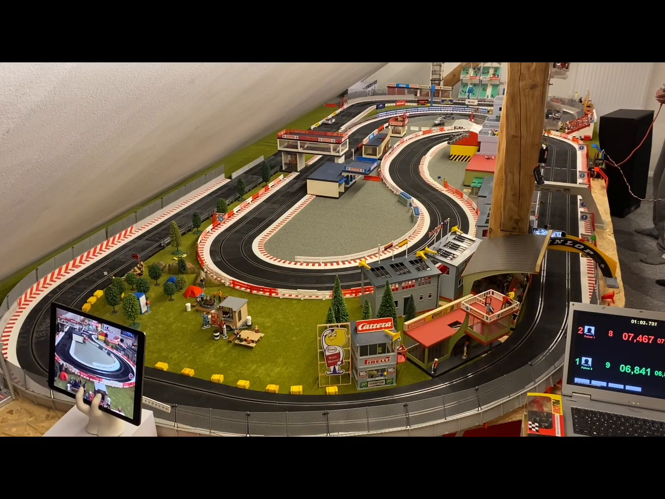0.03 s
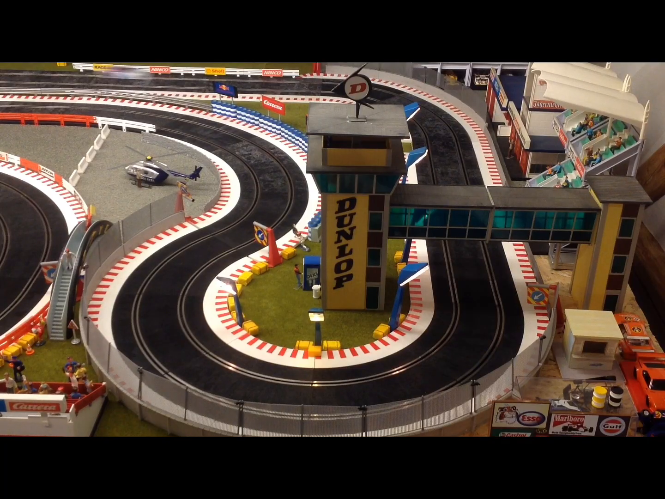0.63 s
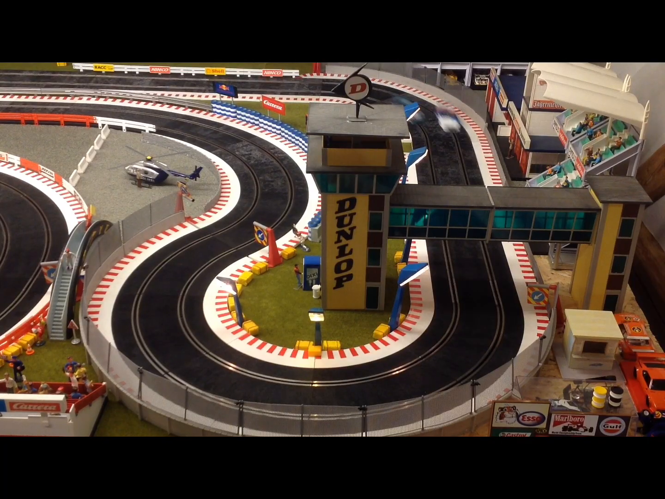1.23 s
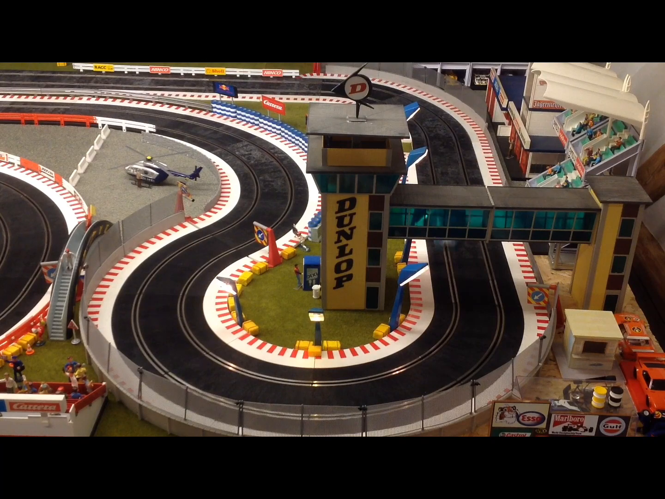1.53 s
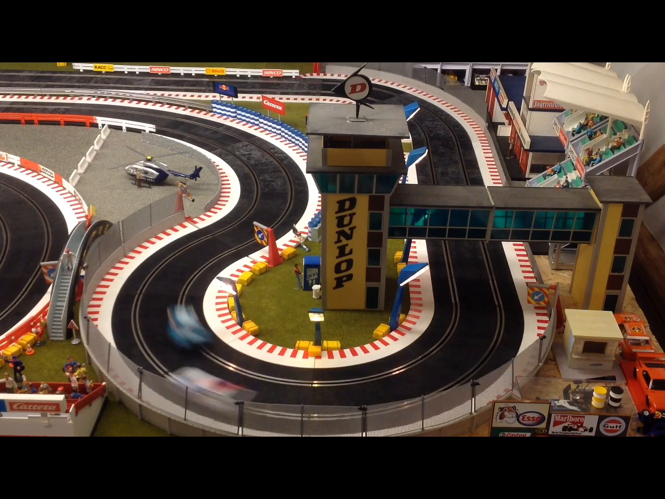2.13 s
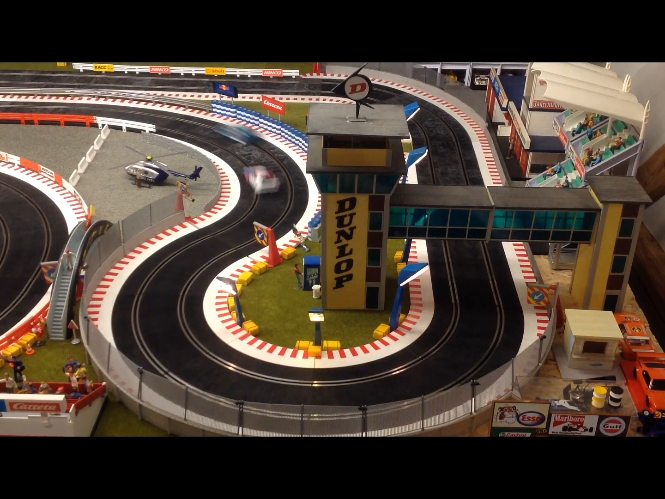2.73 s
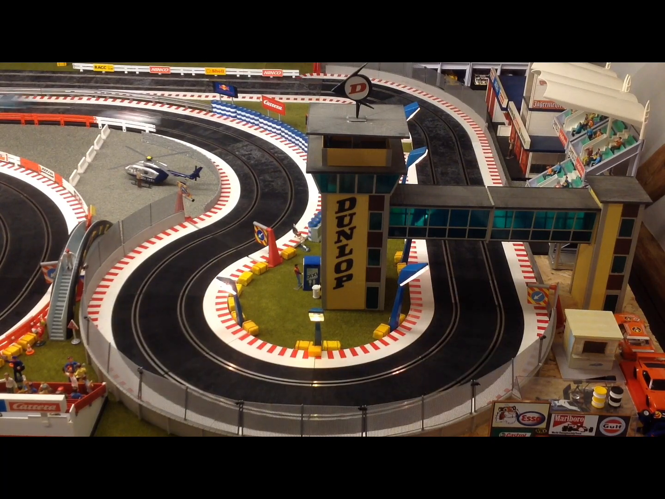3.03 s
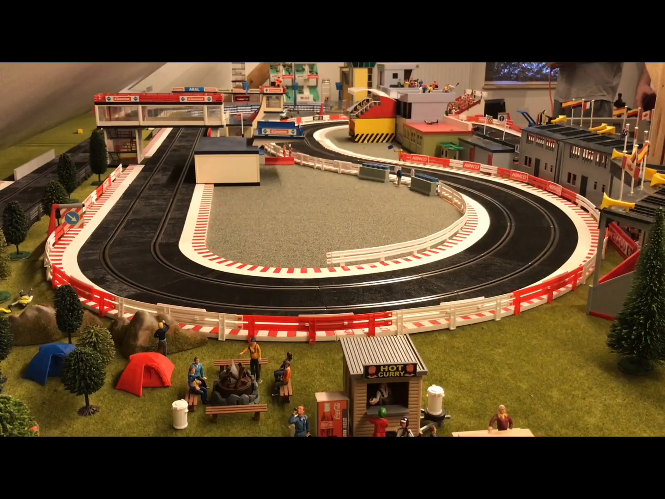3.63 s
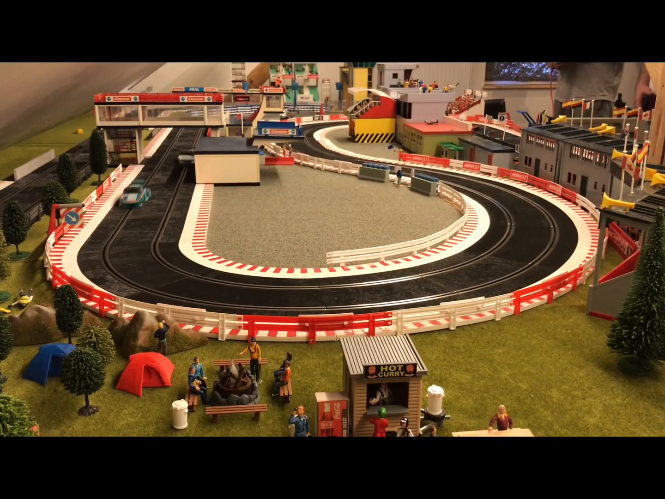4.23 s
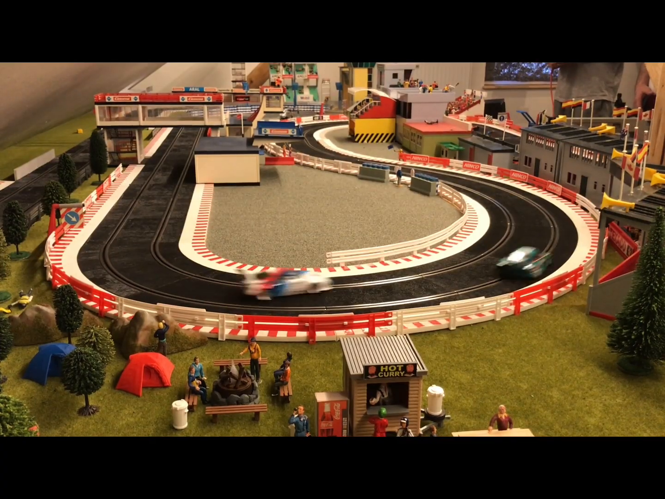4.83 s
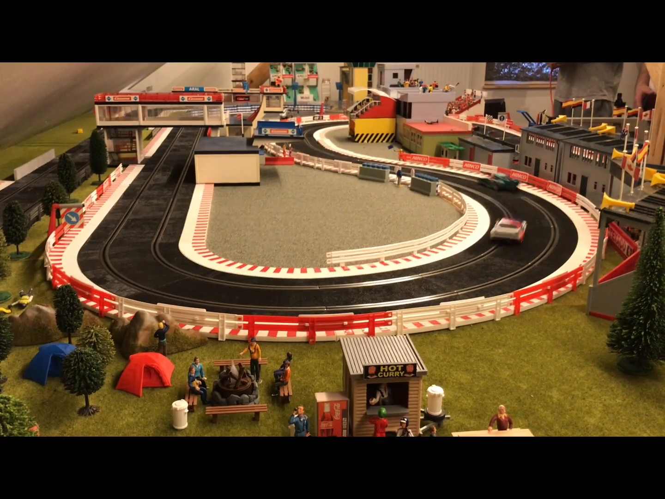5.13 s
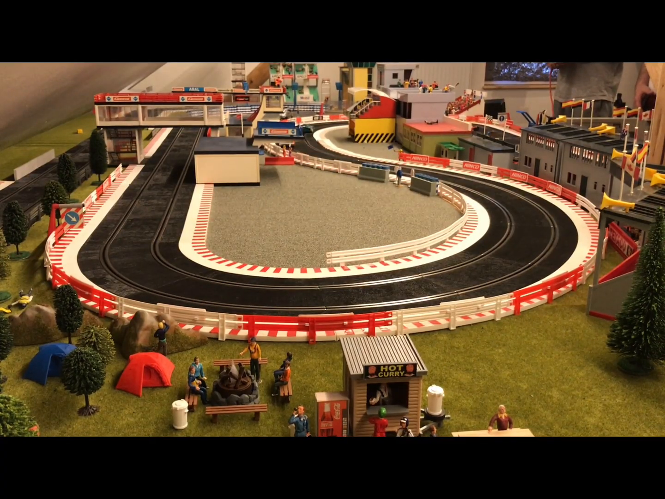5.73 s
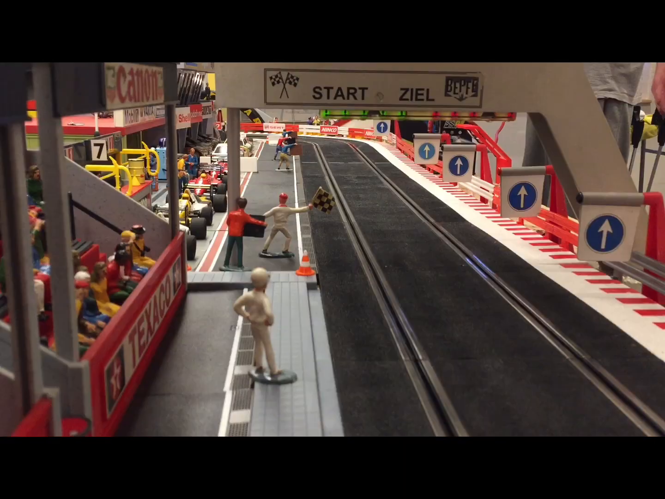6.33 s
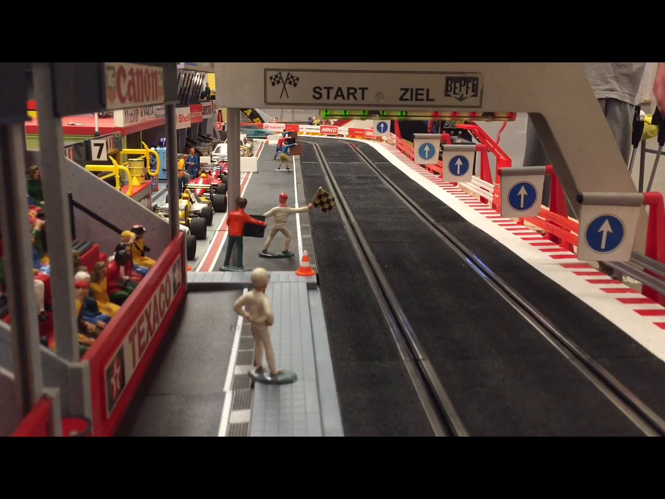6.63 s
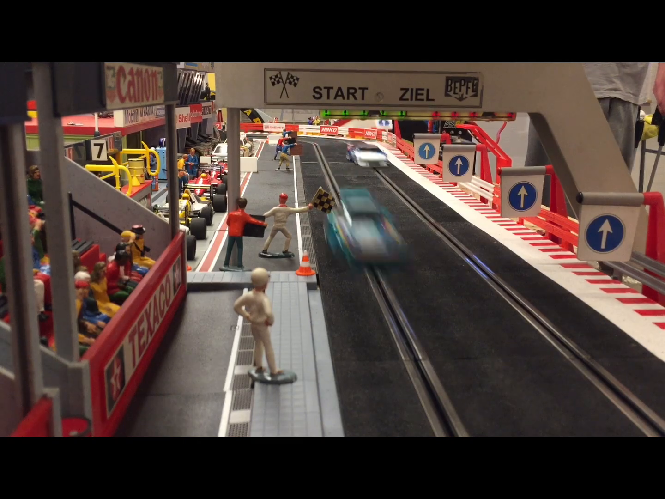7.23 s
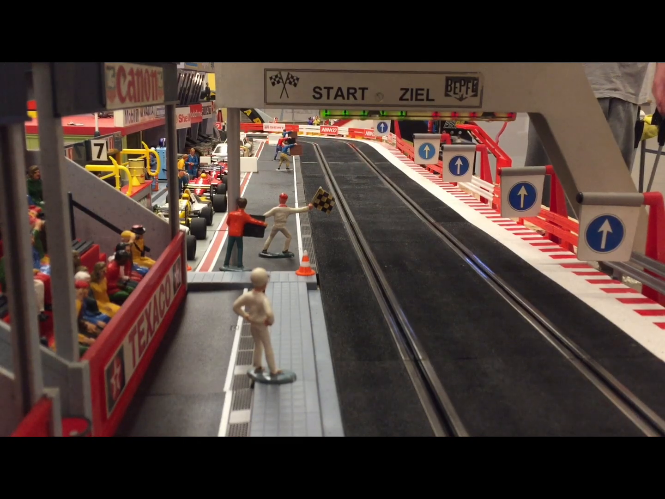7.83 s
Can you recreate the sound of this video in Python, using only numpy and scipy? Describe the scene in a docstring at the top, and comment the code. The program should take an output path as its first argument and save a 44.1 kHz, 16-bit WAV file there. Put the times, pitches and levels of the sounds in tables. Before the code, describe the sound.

Two slot cars race around a plastic track on a table in a small room. Their gears whine in short bursts over the drumming of tyres and a scratchy hiss from the rails, with frequent clicks at the track joints. The tone shifts as the listening spot jumps between trackside positions. Midway the table rumbles and thumps softly, and near the end the cars rush past close by with a loud clatter.

```python
"""Two slot cars race round a plastic track on an attic table, heard in mono from four spots in turn.
Their gears whine with speed, tyres drum on the hollow track, pick-up braids scrape along the rails
and the table rumbles and thumps. The cars clack and rattle over the track joints,
loudest as they rush past on the straight at the end."""
import sys
import numpy as np
from scipy import signal
from scipy.fft import rfft, irfft, next_fast_len
from scipy.io import wavfile
from scipy.ndimage import uniform_filter1d

SR = 44100
rng = np.random.default_rng(int(sys.argv[2]) if len(sys.argv) > 2 else 0)


def dump(signal):
    """Clip the signal to [-1, 1] and save it as 16-bit WAV at the path in sys.argv[1]."""
    limited = np.clip(np.atleast_2d(signal).T, -1, 1)
    pcm = np.round(limited * 32767).astype(np.int16)
    wavfile.write(sys.argv[1], SR, pcm)


N = 347508
TIME = np.arange(N) / SR

# trackside listening spots, one after the other: (start [s], end [s])
SPOTS = [(0, .21), (.21, 3.45), (3.45, 6.29), (6.29, 7.88)]
AT_SPOT = [(TIME >= start) & (TIME < end) for start, end in SPOTS]


def car_gears():
    """Leader and chaser whine in bursts of throttle; returns the sound and the wobble of their axles."""
    # bursts of throttle: (start [s], end [s], start pitch [Hz], end pitch [Hz], relative level [dB])
    lead_bursts = [(.485, .52, 1747, 1710, -37), (.82, .9, 1818, 1697, -40), (1.06, 1.085, 1819, 1795, -40),
                   (1.258, 1.278, 1325, 1310, -32), (1.63, 1.67, 960, 898, -32.5),
                   (2.45, 2.66, 1029, 1136, -43.5), (2.725, 2.76, 1279, 1326, -32.5),
                   (2.775, 2.82, 1325, 1357, -37), (2.935, 2.98, 1470, 1502, -35),
                   (3.52, 3.78, 1247, 1513, -43.5), (4.535, 4.58, 1255, 1259, -38.5),
                   (4.605, 4.66, 1258, 1262, -33), (4.68, 4.77, 1285, 1295, -37),
                   (4.82, 4.86, 1360, 1383, -35.5), (4.98, 5.005, 1390, 1402, -36.5),
                   (5.37, 5.5, 1620, 1770, -43), (6.5, 6.9, 1340, 1394, -44.5),
                   (7.05, 7.12, 1327, 1391, -32)]
    chaser_bursts = [(.12, .22, 1286, 1330, -43), (1.35, 1.4, 1725, 1748, -34.5),
                     (1.9, 2.04, 1061, 969, -36), (2.2, 2.33, 1367, 1572, -37.5),
                     (2.62, 2.79, 1401, 1450, -39.5), (2.825, 2.85, 1463, 1475, -33),
                     (2.88, 3.05, 1525, 1620, -39), (3.35, 3.44, 1438, 1438, -39),
                     (4.65, 4.75, 1551, 1520, -39), (5.06, 5.36, 1340, 1483, -41.5),
                     (5.48, 5.58, 1280, 1456, -42.5), (6.32, 6.64, 1530, 1684, -47),
                     (7.12, 7.24, 1604, 1770, -34), (7.4, 7.58, 1654, 1653, -41)]
    lead, lead_axle = gear_whine(lead_bursts, rasp_hz=40, blur=.01707, wander=.018,
                                 overtone_db=-21, whirr_db=-11, trim_db=-2)
    chaser, chaser_axle = gear_whine(chaser_bursts, rasp_hz=61, blur=.0232, wander=.04,
                                     overtone_db=-26, whirr_db=-7.5, trim_db=-2.5)
    return lead + chaser, lead_axle + chaser_axle


def gear_whine(bursts, rasp_hz, blur, wander, overtone_db, whirr_db, trim_db):
    """Meshing teeth sing, roughened by backlash and wheel slip; returns the whine and the axle's turn."""
    # second to fifth harmonic of the mesh tone: (relative level [dB])
    harmonics = [6, -1, -4, -5]
    crown_teeth, runout = 27, .41
    hz, level_db = throttle(bursts)
    waver = 1 + blur * drift(265) + wander * np.tanh(drift(22))   # grip and current waver
    mesh = 2 * np.pi * np.cumsum(hz * waver) / SR
    axle = np.sin(mesh / crown_teeth)
    rasp = drift(rasp_hz) * np.sin(mesh) + drift(rasp_hz) * np.cos(mesh)
    rasp /= np.sqrt(uniform_filter1d(rasp ** 2, size=1500) + .1)   # even out the slow swells
    overtones = sum(from_db(overtone_db + db) * np.sin(k * mesh) for k, db in enumerate(harmonics, 2))
    tone = rasp + drift(2 * rasp_hz) * overtones
    whirr = drift(160) * np.sin(mesh) + drift(160) * np.cos(mesh)   # rattling teeth spread the tone
    tone += from_db(whirr_db) * whirr
    tone *= 1 + runout * axle   # an off-centre gear bites harder once a turn
    return from_db(level_db + trim_db) * rms_one(tone), axle


def throttle(bursts):
    """Gear pitch [Hz] and level [dB]: a burst swells, holds as the pitch glides, and fades to coasting."""
    attack_s, release_s, coasting_db = .039, .025, -57.5
    gain, glide = np.full(N, from_db(coasting_db)), []
    for start, end, start_hz, end_hz, db in bursts:
        glide += [(start, start_hz), (end, end_hz)]
        outside = np.maximum((start - TIME) / attack_s, (TIME - end) / release_s)
        gain = np.maximum(gain, from_db(db) * np.exp(-np.clip(outside, 0, 20)))
    times, pitches = np.transpose(sorted(glide))
    flutter_db = 2.5 * np.tanh(drift(43))   # the car shakes in its slot
    return np.interp(TIME, times, pitches), 20 * np.log10(gain) + flutter_db


def joint_clacks(rattles):
    """Each jolt, at a joint or from a light rattle, is a fading burst that rings track, chassis, guide."""
    # jolts at the joints, plus a click at 6.291 s as the scene changes to the fourth spot, levels relative: #
    # (time [s], length [s], knock pitch [Hz], knock level [dB], click pitch [Hz], click level [dB])
    jolts = [(.0095, 0.0042, 1770, -22.5, 3100, -25.5), (.619, 0.0094, 2240, -25, 3300, -29.5),
             (.657, 0.029, 1260, -37, 5140, -31.5), (.786, 0.016, 1930, -37, 4770, -26),
             (.855, 0.0072, 1800, -29, 4410, -32), (.884, 0.018, 1520, -26, 3930, -29),
             (.95, 0.015, 2090, -32, 3380, -33.5), (1.2925, 0.0085, 985, -24.5, 2770, -26.5),
             (1.378, 0.013, 1760, -31, 3080, -36), (1.401, 0.0097, 830, -20.5, 3020, -28),
             (1.408, 0.008, 1560, -26, 3040, -34), (1.44, 0.013, 806, -33, 3300, -48),
             (1.502, 0.0054, 1950, -33, 3700, -25), (1.507, .005, 2100, -35, 5500, -26.5),
             (1.514, 0.015, 970, -34, 3000, -29), (1.547, 0.0076, 2000, -30, 3300, -35),
             (1.754, 0.02, 900, -32, 3260, -35), (1.872, 0.019, 1100, -38, 3650, -39.5),
             (2.173, 0.0071, 1400, -41, 3270, -41), (2.295, 0.0097, 1520, -26, 2880, -32.5),
             (2.35, 0.013, 1400, -28, 3300, -45), (2.364, 0.021, 840, -29.5, 5120, -41),
             (3.2475, 0.007, 1090, -23.5, 4020, -25), (3.328, 0.007, 1750, -31, 3700, -25.5),
             (3.337, 0.011, 1770, -37, 5340, -26), (3.438, 0.0078, 2220, -34, 3000, -35),
             (4.035, 0.0021, 1214, -24.5, 4080, -14.5), (4.077, 0.013, 2070, -37, 4270, -32),
             (4.123, 0.022, 2270, -33, 5600, -29.5), (4.179, 0.0094, 1600, -30, 5650, -34),
             (4.228, 0.013, 1270, -32, 5600, -32.5), (4.255, 0.0072, 1120, -33, 3400, -34),
             (4.298, 0.013, 1100, -33.5, 3320, -41), (4.36, 0.011, 2170, -36.5, 3400, -37),
             (4.376, .005, 2010, -35, 3400, -42), (4.387, 0.0059, 1394, -35, 4900, -30),
             (4.716, 0.0059, 1810, -34, 5000, -37), (4.745, 0.0051, 1500, -41, 5790, -36),
             (4.82, 0.0069, 1400, -41, 5760, -35), (4.973, 0.0076, 1400, -28.5, 5400, -28.5),
             (5.082, 0.0055, 1504, -49, 5010, -41), (5.239, 0.0054, 1496, -35, 6000, -41),
             (5.366, 0.0066, 1733, -30, 4830, -28), (5.556, 0.027, 2314, -39, 5800, -38),
             (5.836, 0.018, 1190, -37, 3700, -47), (5.86, 0.016, 720, -36, 3680, -55),
             (6.291, .018, 1700, -33, 2570, -43), (6.358, 0.016, 928, -26, 2940, -41),
             (6.385, 0.0078, 848, -23.5, 3500, -44), (6.583, 0.0069, 1575, -32, 3520, -38),
             (6.611, 0.012, 1676, -26, 3970, -36.5), (6.799, 0.0085, 1490, -43, 4090, -37.5),
             (6.852, 0.0057, 1520, -31, 3500, -40), (6.98, 0.0049, 1500, -37, 3080, -36),
             (7.043, 0.011, 1380, -33, 3340, -37.5), (7.147, 0.011, 1374, -33, 3186, -23),
             (7.173, 0.027, 1700, -31, 3500, -32), (7.2612, 0.0048, 2524, -24, 3920, -19),
             (7.277, 0.0086, 1180, -24, 2940, -35), (7.302, 0.0072, 1750, -21, 3240, -17),
             (7.309, 0.0072, 890, -16.5, 6400, -20.5), (7.321, 0.0076, 1690, -17, 3260, -39),
             (7.3425, 0.0029, 1570, -13, 3500, -12), (7.3455, 0.005, 870, -13, 6000, -24),
             (7.363, 0.0043, 1670, -18, 3570, -34), (7.379, 0.0091, 1490, -21, 3470, -28),
             (7.394, 0.0066, 1400, -31, 3500, -33), (7.4065, 0.0031, 1890, -18, 3800, -14),
             (7.409, 0.0058, 940, -14.5, 3360, -21), (7.419, 0.0068, 1570, -28, 3440, -44),
             (7.435, 0.0076, 1155, -22, 3410, -44), (7.444, 0.0047, 1310, -8.5, 5430, -22),
             (7.4485, 0.0026, 1250, -13.5, 3470, -21), (7.4725, 0.0048, 1510, -17, 3570, -34),
             (7.484, 0.0032, 1630, -20, 4270, -26.5), (7.511, 0.0041, 1630, -18.5, 3740, -30),
             (7.547, 0.0087, 1700, -37, 3470, -36), (7.56, 0.0062, 1670, -26, 4170, -51),
             (7.578, .008, 1490, -31, 2910, -33), (7.603, 0.012, 990, -25.5, 3700, -34),
             (7.622, 0.0064, 1204, -28, 3500, -39), (7.641, 0.0044, 1300, -17, 3880, -33),
             (7.666, 0.02, 990, -23, 2770, -34), (7.682, 0.017, 1240, -26.5, 3000, -46),
             (7.726, 0.003, 990, -23, 2900, -44), (7.742, 0.0036, 1290, -25, 3030, -45)]
    # resonances of track (knock), chassis (click), guide (sizzle): (pitch [Hz], width [Hz], level [dB])
    track_modes = [(201, 300, -10.5), (410, 410, -13), (630, 610, -10), (937, 260, -3), (1214, 160, -1.5),
                   (1604, 380, -4.5), (2230, 380, -10)]
    chassis_modes = [(2350, 1060, 2.5), (3250, 590, 3), (4230, 1700, -0.5), (5640, 1800, -1.5)]
    guide_modes = [(6830, 540, 15), (8250, 5400, 17.5), (12600, 3200, 11)]
    # the guide's sizzle at each spot: (level against the click [dB])
    sizzle_db = [-30, -5, -1.5, -7.5]
    size = 4096
    out, age = np.zeros(N + size), np.arange(size) / SR
    for s, length, knock_hz, knock_db, click_hz, click_db in list(jolts) + rattles:
        at = int(s * SR)
        spot = sum(s >= start for start, end in SPOTS[1:])
        pressure = (1 - np.exp(-age / (.09 * length))) * np.exp(-(age / length) ** .93)
        damping = (.01 / length) ** .5   # the shortest jolts ring the broadest
        # the struck parts add a ring at their own pitch
        track = track_modes + [(knock_hz, 420 * damping, 5)]
        chassis = chassis_modes + [(click_hz, 700 * damping, 10)]
        parts = (track, knock_db), (chassis, click_db), (guide_modes, click_db + sizzle_db[spot])
        for modes, db in parts:
            ring = sum(resonate(rng.standard_normal(size) * pressure + 1e-18, *mode) for mode in modes)
            out[at:at + size] += from_db(db) * np.sqrt(length * SR / size) * rms_one(ring)
    return highpass(out[:N], 122, order=4)


def small_rattles(tyre_db, braid_db):
    """Rows of light jolts at random moments, louder when the cars are near."""
    count, per_s, length_s, spread_octaves, spread_db = 240, 18, .0074, .26, 1.5
    times = np.cumsum(rng.exponential(1 / per_s, count))
    scatter = rng.standard_normal((count, 4))
    rows = []
    for s, luck in zip(times[times < TIME[-1]], scatter):
        at = int(s * SR)
        knock_hz, click_hz = [1620, 3600] * 2 ** (spread_octaves * luck[:2])
        knock_db, click_db = [tyre_db[at] - 8, braid_db[at] - 9.5] + spread_db * luck[2:]
        rows.append((s, length_s, knock_hz, knock_db, click_hz, click_db))
    return rows


def running_noise(rumble_db, tyre_db, braid_db, wobble):
    """Tyres, braids and table; bouncing and each turn of the wheels vary the pressure on the track."""
    bounce, tick_decay_s = drift(20), .0016
    ticks = np.abs(contacts(per_s=140, spread_db=4))
    rattle = signal.lfilter([1], [1, -np.exp(-1 / (tick_decay_s * SR))], ticks)
    judder = 1 + .12 * rms_one(rattle)   # loose bodies chatter in small irregular ticks
    tyres = tyre_drumming(tyre_db, bounce, wobble, judder)
    braids = braid_scrape(braid_db, bounce, wobble, judder)
    return from_db(-3.5) * tyres + from_db(.55) * braids + from_db(-.3) * table_rumble(rumble_db)


def tyre_drumming(level_db, bounce, wobble, judder):
    """Thousands of tiny tread impacts a second drum on the hollow track."""
    # tone colour of tyres on track, one curve per spot: (frequency [Hz], level [dB])
    colours = [
        [(260, -37), (450, -13), (691, -16), (810, -10.5), (1480, -4), (1710, -3), (3000, -13.5), (3900, -47),
         (6600, -120)],
        [(260, -3.5), (450, -6.5), (643, -5.5), (842, -1.5), (964, 0), (1140, -0.5), (1320, 2), (1780, -3),
         (2080, -7), (3000, -28), (3900, -55), (6600, -120)],
        [(260, -34), (450, -2.5), (580, -1.5), (1250, 4), (1360, 4.5), (1750, 1.5), (1910, 2), (2250, -5),
         (3000, -17), (3900, -10), (6600, -120)],
        [(260, 4.5), (450, 2), (527, -9), (628, -4), (685, -6.5), (778, -5.5), (877, -1), (1150, 0.5),
         (1380, 4), (2000, -3), (3000, -13.5), (3900, -39), (6600, -120)],
    ]
    tread = judder * contacts(per_s=5000, spread_db=1.5)
    tread *= from_db(.95 * bounce + .47 * drift(30) + .32 * wobble)
    tread = shifting_resonances(tread, 560, 3400, count=22, depth_db=6, rate_hz=11, overlap=.8)
    out = np.zeros(N)
    for here, colour in zip(AT_SPOT, colours):
        out[here] = from_db(level_db[here]) * coloured(tread[here], colour)
    return out


def braid_scrape(level_db, bounce, wobble, judder):
    """Pick-up braids hiss along the rails in a dense stream of contacts, brighter when near."""
    # tone colour of braids on rails, one curve per spot: (frequency [Hz], level [dB])
    colours = [
        [(2400, -29), (3250, 8), (4200, -0.5), (7000, -2), (12000, -7), (16000, -10)],
        [(1590, 7), (2700, 2), (3340, 0), (3810, -3), (5060, -3.5), (6490, -4), (8300, -2), (10000, -4),
         (11800, -3), (12900, -2), (14900, -5), (15300, -9), (15600, -18)],
        [(2400, -7), (3000, -6), (4000, -5), (4800, -2.5), (6300, -1), (7500, 0.5), (8300, 4.5), (9000, 3.5),
         (10300, -5), (11700, -7.5), (12900, -7), (14200, -14), (15700, -18)],
        [(2400, 3.5), (2900, 2), (3350, 5), (4200, 2), (4900, -2), (6300, -0.5), (7500, -3.5), (8400, -1),
         (10400, -8), (12700, -2), (15700, -10)],
    ]
    scrape = judder * barrier_reflection(contacts(per_s=11000, spread_db=1))
    scrape *= from_db(1.16 * bounce + .5 * drift(99) + .25 * wobble)
    scrape = shifting_resonances(scrape, 2900, 13500, count=22, depth_db=4.2, rate_hz=9, overlap=.6)
    out = np.zeros(N)
    for here, colour in zip(AT_SPOT, colours):
        db = level_db[here]
        hiss = coloured(scrape[here], colour)
        treble = highpass(hiss, 6900, order=1)
        treble_gain = from_db(.46 * (db - db.mean()))
        out[here] = from_db(db) * (hiss + (treble_gain - 1) * treble)
    return out


def braid_song():
    """A band of sizzle swells and fades as a car leans on its braids."""
    # swells: (peak time [s], half width [s], pitch [Hz], bandwidth [Hz], level [dB])
    swells = [(1.9, .45, 12850, 900, -51), (3.0, 0.36, 12800, 910, -46.5), (4.95, 0.27, 8450, 1200, -43.5),
              (7.22, 0.077, 8210, 899, -42), (7.32, .13, 12900, 1000, -41), (7.65, 0.042, 11600, 4500, -39)]
    out = np.zeros(N)
    for s, half_width, hz, width, db in swells:
        band = rms_one(resonate(rng.standard_normal(N), hz, width, 0))
        out += from_db(db) * np.exp(-.5 * ((TIME - s) / half_width) ** 2) * band
    return out * from_db(1.5 * drift(40))


def rail_chatter(braid_db):
    """Guides and braids tick at random against rails and plastic; each tick leaves one mode ringing."""
    # modes of rails and plastic: (pitch [Hz], relative level [dB], t60 [s])
    modes = [(864, 1.5, 0.056), (1894, -0.5, .05), (2200, -4.5, 0.055), (2560, -4, 0.047), (2880, -5, .05),
             (3350, -4.5, 0.092), (3790, -5.5, 0.093), (4370, -6, .03), (5180, -9, .03), (6480, -7, .03)]
    out = np.zeros(N)
    for hz, db, t60 in modes:
        r = from_db(-60 / (t60 * SR))
        poles = [1, -2 * r * np.cos(2 * np.pi * hz / SR), r * r]
        ticks = contacts(per_s=22, spread_db=2.5)
        out += from_db(db) * rms_one(signal.lfilter([1, 0, -1], poles, ticks))
    return from_db(braid_db - 17.5) * out


def rail_pings():
    """A guide flicks a loose rail end, which rings on."""
    # flicks: (time [s], level [dB])
    flicks = [(.658, -34), (1.755, -41)]
    # the rail's ring: (pitch [Hz], relative level [dB], t60 [s])
    modes = [(3284, 0, 0.22), (3600, -5, .12), (4850, -3, .2)]
    out = np.zeros(N)
    for s, db in flicks:
        age = TIME[TIME >= s] - s
        for hz, mode_db, t60 in modes:
            out[N - len(age):] += ring_down(age, hz, db + mode_db, t60)
    return out


def table_thumps():
    """A car lands on a loose stretch and sets one panel of the table ringing briefly."""
    # landings: (time [s], level [dB], pitch [Hz])
    landings = [(3.943, -24.5, 86), (4.026, -22, 110), (4.25, -22, 108), (4.35, -26, 100),
                (4.841, -28, 143), (5.062, -28, 100), (5.19, -26, 124.5)]
    out, rise_s = np.zeros(N), .0044
    for s, db, hz in landings:
        age = TIME[TIME >= s] - s
        out[N - len(age):] += (1 - np.exp(-age / rise_s)) * ring_down(age, hz, db, t60=.16)
    return out


def table_rumble(level_db):
    """The running cars shake the table, which sounds deeper when they are near."""
    # tone colour of the table, one curve per spot: (frequency [Hz], level [dB])
    colours = [
        [(18, -54), (30, -40), (64, -7), (220, -13), (259, -9), (578, -36), (600, -30), (780, -52),
         (1320, -120)],
        [(35, -62), (60, -26), (102, -21), (110, -36), (122, -6), (183, 5), (424, -2), (600, -23), (780, -48),
         (1320, -120)],
        [(18, -45), (30, -16.5), (102, 1.5), (178, -3.5), (246, -4), (297, -7.5), (341, -6.5), (387, -15),
         (600, -20), (780, -73), (1320, -120)],
        [(18, -47), (30, -12), (86, 4.5), (101, 5), (151, -3), (212, 4), (240, -5), (325, -5), (455, -16),
         (600, -13.5), (780, -15), (1320, -120)],
    ]
    shake = rng.standard_normal(N)
    shake = shifting_resonances(shake, 90, 420, count=11, depth_db=7, rate_hz=5, overlap=.5)
    out = np.zeros(N)
    for here, colour in zip(AT_SPOT, colours):
        db = level_db[here]
        boom = coloured(shake[here], colour)
        bass = boom - highpass(boom, 350, order=1)
        bass_gain = from_db(.41 * (db - db.mean()) - 1)
        out[here] = from_db(db) * (boom + (bass_gain - 1) * bass)
    return out


def nearness():
    """Level curves [dB] of rumble, tyres and braids: a bed of distant cars plus a swell for each pass."""
    # distant cars at each spot, levels relative: (rumble [dB], tyres [dB], braids [dB])
    beds = [(-37, -34, -43), (-50.5, -35.5, -41), (-41, -46, -49), (-40.5, -32.5, -48)]
    # a car comes near or crosses a hollow stretch, levels relative:
    # (peak time [s], half width [s], rumble [dB], tyres [dB], braids [dB])
    passes = [(.17, 0.036, -65, -34, -42.5), (.385, 0.16, -44, -47, -37), (.5, 0.034, -50, -46, -38.5),
              (.66, 0.16, -45.5, -43, -36), (.84, 0.12, -43, -35, -32), (1.16, 0.029, -39, -44, -44),
              (1.43, 0.1, -44.5, -29.5, -33.5), (1.8, 0.12, -63, -32.5, -44), (2.3, 0.14, -73, -35, -39.5),
              (2.98, 0.28, -49, -34, -37.5), (3.281, 0.15, -45.5, -35.5, -33),
              (3.68, 0.19, -64, -45, -45.5), (4.14, 0.25, -35.5, -39, -37.5), (4.32, .07, -37, -43, -50),
              (4.75, 0.39, -48, -38, -41.5), (5.17, 0.58, -42.5, -40.5, -39.5),
              (5.39, 0.047, -39, -42, -45), (5.87, 0.021, -37, -43, -43), (6.1, 0.058, -37.5, -40.5, -44.5),
              (6.39, 0.048, -36.5, -29.5, -46.5), (6.61, 0.058, -37.5, -47, -46.5),
              (6.75, .05, -41, -48, -65), (6.83, 0.038, -57, -37, -44.5), (7.1, 0.092, -46, -36, -42.5),
              (7.29, 0.033, -27, -25, -46), (7.34, 0.069, -32, -31.5, -31), (7.44, 0.088, -29, -45, -37.5),
              (7.649, 0.097, -30.5, -29, -37.5), (7.79, 0.086, -33.5, -54, -70)]
    power, falloff = np.zeros((3, N)), 1.82
    for (start, end), here, bed_db in zip(SPOTS, AT_SPOT, beds):
        power[:, here] = from_db(bed_db)[:, None] ** 2
        for s, width, *db in passes:
            if start <= s < end:
                distance_squared = 1 + ((TIME[here] - s) / width) ** 2
                power[:, here] += from_db(db)[:, None] ** 2 / distance_squared ** falloff
    return 10 * np.log10(power)


def shifting_resonances(x, low_hz, high_hz, count, depth_db, rate_hz, overlap):
    """As the cars move from piece to piece of track, now one resonance speaks and now another."""
    pitches = np.geomspace(low_hz, high_hz, count)
    spacing = pitches[1] / pitches[0] - 1
    out = x.copy()
    for hz in pitches:
        gain = from_db(depth_db * np.tanh(.7 * drift(rate_hz)))
        out += (gain - 1) * resonate(x, hz, overlap * spacing * hz, 0)
    return out


def barrier_reflection(x, delay_s=.00118, strength=.16):
    """At the third spot a short reflection off the trackside barrier combs the sound."""
    return x + strength * AT_SPOT[2] * np.roll(x, int(delay_s * SR))


def attic(x, t60=.31, wall_cut_hz=8700):
    """Short echoes circle between the walls, duller on every round."""
    out, dull = np.zeros(N), np.exp(-2 * np.pi * wall_cut_hz / SR)
    lags = (rng.uniform(.007, .033, size=10) * SR).astype(int)
    for k, lag in enumerate(lags):
        loop, state = x.copy(), [0.]
        gain = from_db(-60 * lag / SR / t60)
        for i in range(lag, N, lag):
            back, state = signal.lfilter([gain * (1 - dull)], [1, -dull], loop[i - lag:i], zi=state)
            loop[i:i + lag] += back[:N - i]
        out += (loop - x) * (-1) ** k
    return out


def contacts(per_s, spread_db):
    """Tiny random impacts of uneven size, at unit power."""
    sizes = from_db(spread_db * np.minimum(rng.exponential(1, N), 4)) * rng.choice([-1, 1], N)
    return rms_one(sizes * (rng.random(N) < per_s / SR))


def drift(rate_hz):
    """Smooth random modulation with spread 1, rolling off above rate_hz."""
    step, settle = 20, 2000
    r = np.exp(-2 * np.pi * rate_hz * step / SR)
    noise = rng.standard_normal(N // step + settle + 2)
    slow = signal.lfilter([1], [1, -2 * r, r * r], noise)[settle:]
    return np.interp(np.arange(N) / step, np.arange(len(slow)), rms_one(slow))


def coloured(x, curve):
    """Equalise x by a curve that falls 36 dB an octave beyond its ends; unit power."""
    size = next_fast_len(len(x) + 2048)
    octave = np.log2(np.maximum(np.arange(size // 2 + 1) * SR / size, 1))
    hz, db = np.transpose(curve)
    outside = np.abs(octave - np.clip(octave, np.log2(hz[0]), np.log2(hz[-1])))
    gain = from_db(np.interp(octave, np.log2(hz), db) - 36 * outside)
    return rms_one(irfft(rfft(x, size) * gain, size)[:len(x)])


def resonate(x, hz, width, db):
    """One damped resonance, applied twice for steep flanks."""
    r = np.exp(-np.pi * width / SR)
    zeros = np.array([1, 0, -1]) * (1 - r * r) / 2
    poles = [1, -2 * r * np.cos(2 * np.pi * hz / SR), r * r]
    return from_db(db) * signal.lfilter(zeros, poles, signal.lfilter(zeros, poles, x))


def ring_down(age, hz, db, t60):
    """A struck mode: a sine that loses 60 dB in t60 seconds."""
    return from_db(db - np.minimum(60 * age / t60, 200)) * np.sin(2 * np.pi * hz * age)


def highpass(x, hz, order):
    """Roll off the lows."""
    return signal.sosfilt(signal.butter(order, hz, "high", fs=SR, output="sos"), x)


def from_db(db):
    """Decibels to gain."""
    return 10 ** (np.asarray(db) / 20)


def rms_one(x):
    """Scale to unit power."""
    return x / np.sqrt(np.mean(x ** 2) + 1e-20)


def scene():
    """Gears and jolts in the attic over the running noise, the same in both ears."""
    rumble_db, tyre_db, braid_db = nearness()
    gears, wobble = car_gears()
    cars = gears + rail_pings() + rail_chatter(braid_db)
    cars += from_db(-1.5) * joint_clacks(small_rattles(tyre_db, braid_db))
    running = running_noise(rumble_db, tyre_db, braid_db, wobble)
    mono = cars + from_db(-20) * attic(cars) + running + braid_song() + table_thumps()
    return np.array([mono, mono])


def record(dry):
    """Soft saturation rounds the peaks and a steep low-pass cuts the very top."""
    ceiling, cutoff_hz = .95, 15800
    rounded = ceiling * np.tanh(dry / ceiling)
    return signal.sosfilt(signal.ellip(12, .1, 80, cutoff_hz, fs=SR, output="sos"), rounded)


dry = scene()
out = record(dry)
dump(out)
```